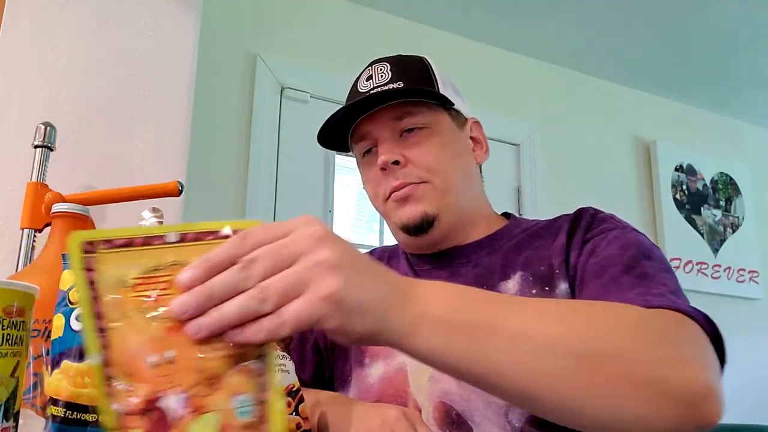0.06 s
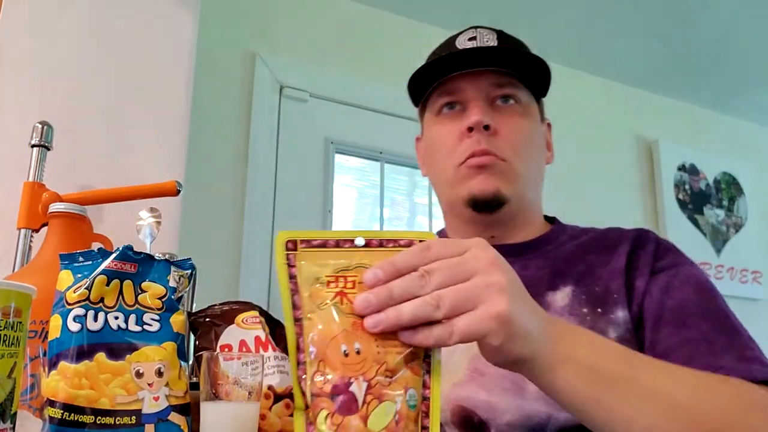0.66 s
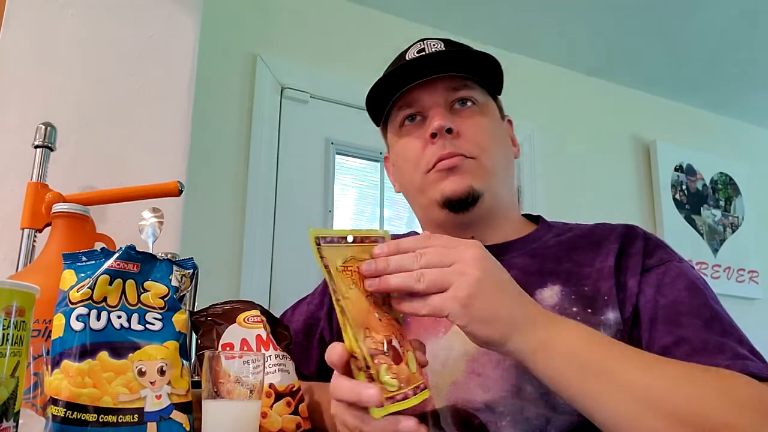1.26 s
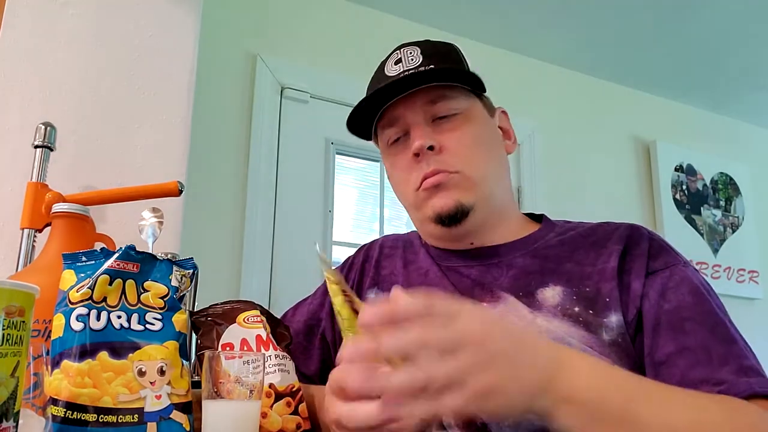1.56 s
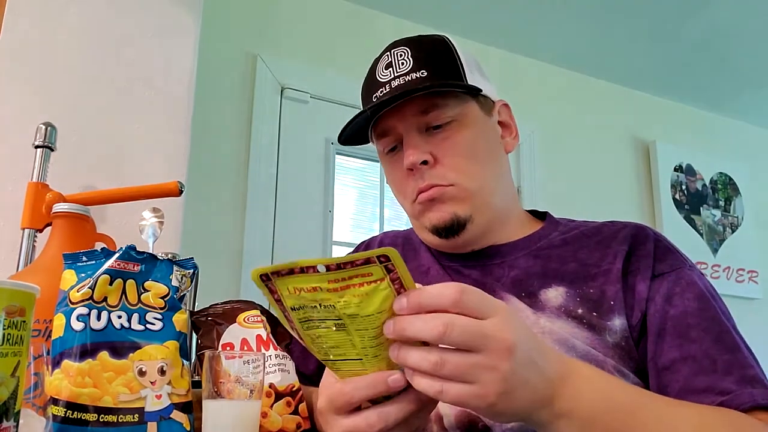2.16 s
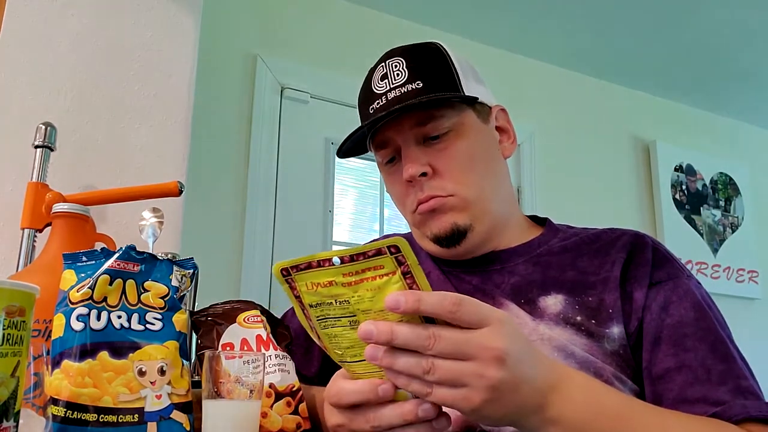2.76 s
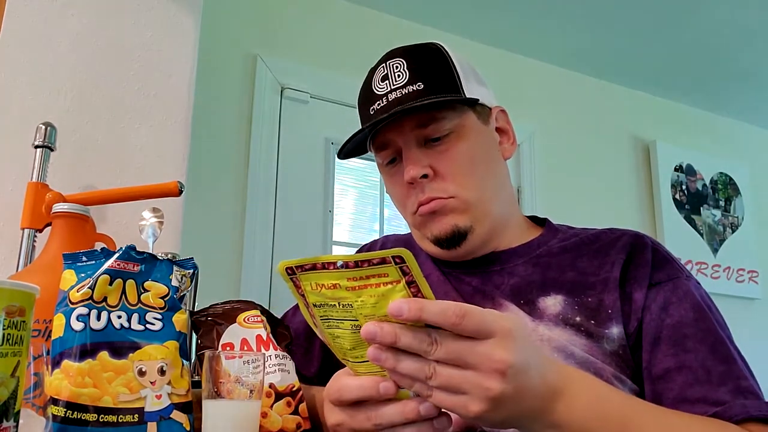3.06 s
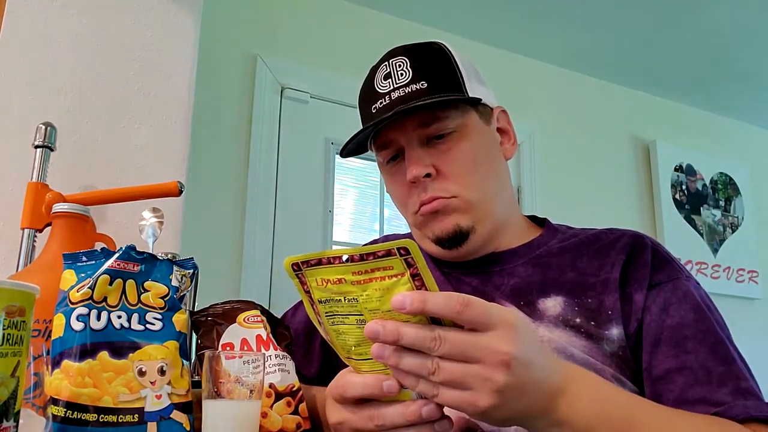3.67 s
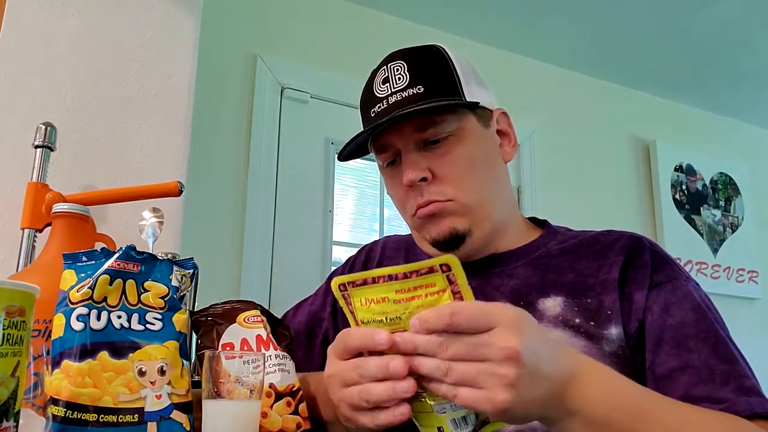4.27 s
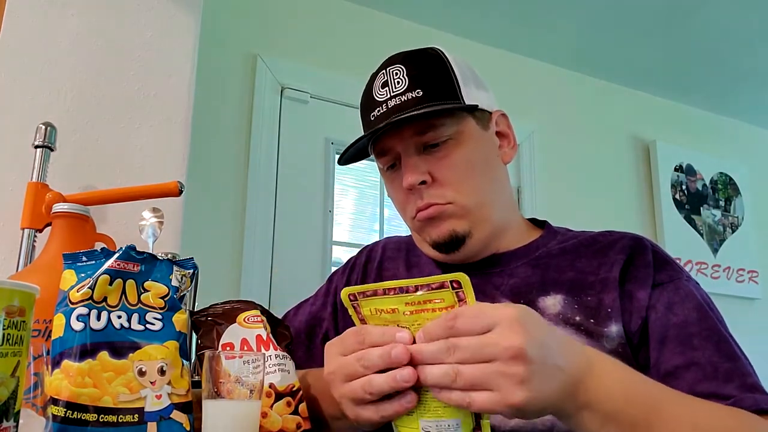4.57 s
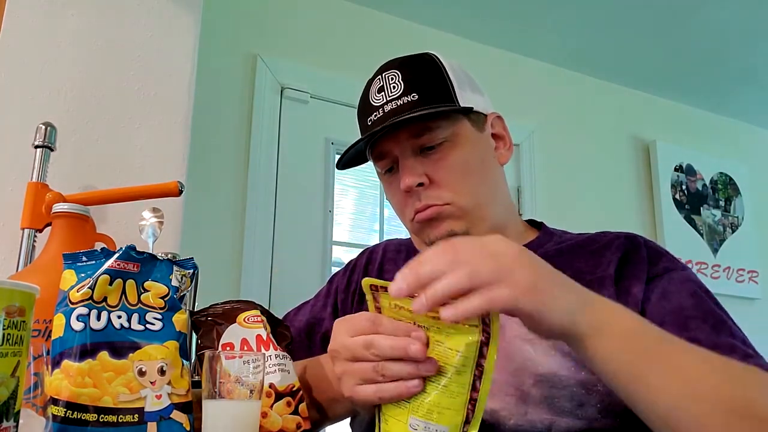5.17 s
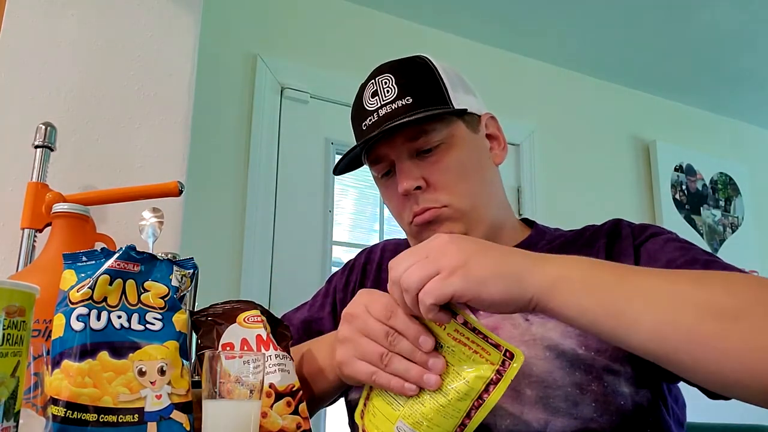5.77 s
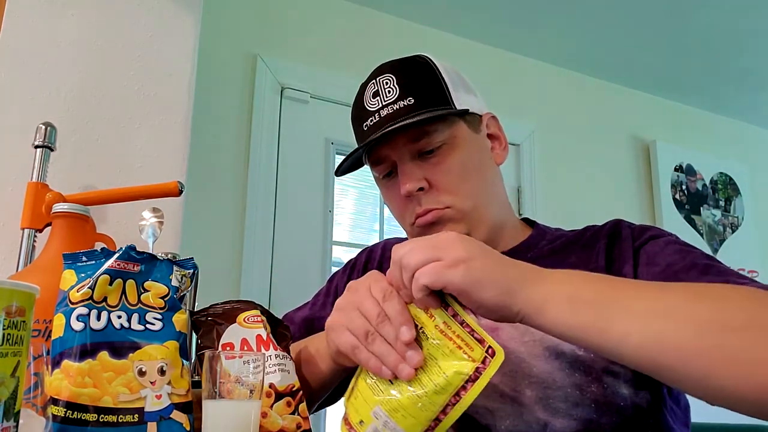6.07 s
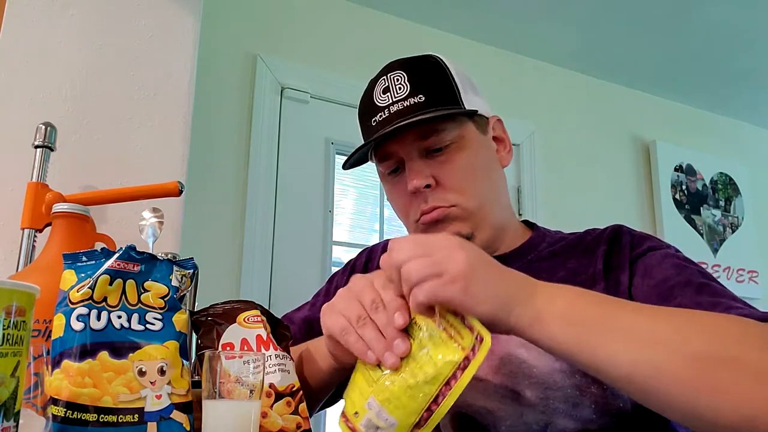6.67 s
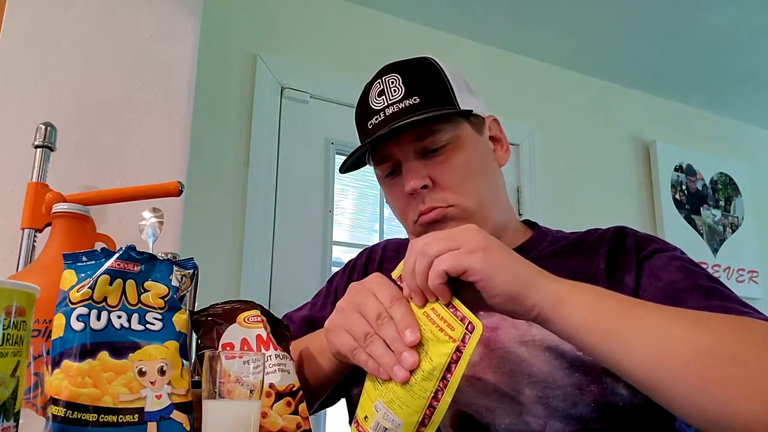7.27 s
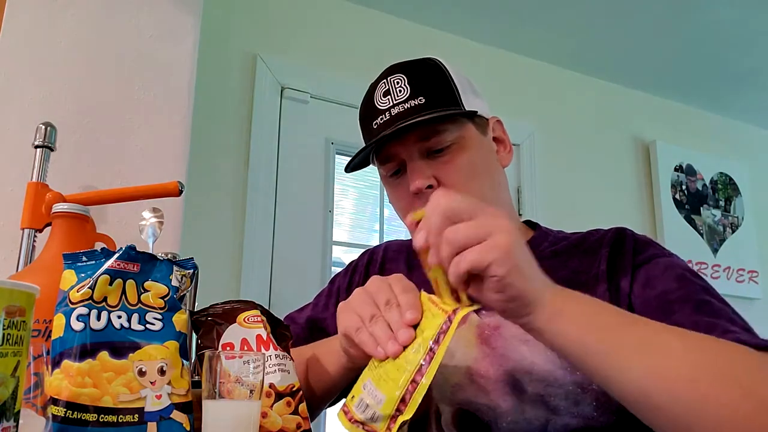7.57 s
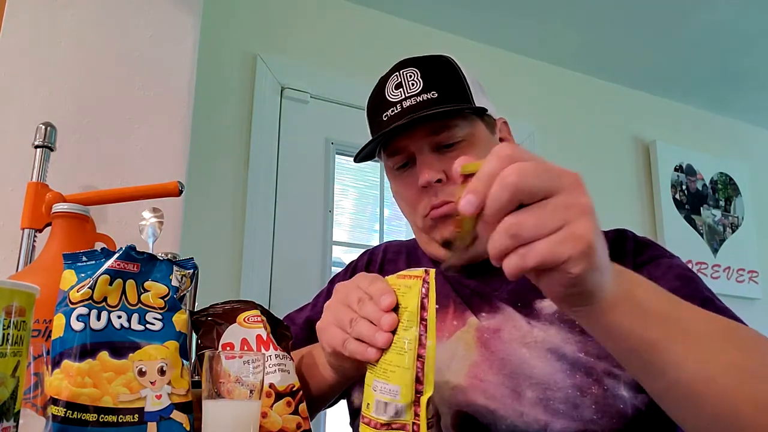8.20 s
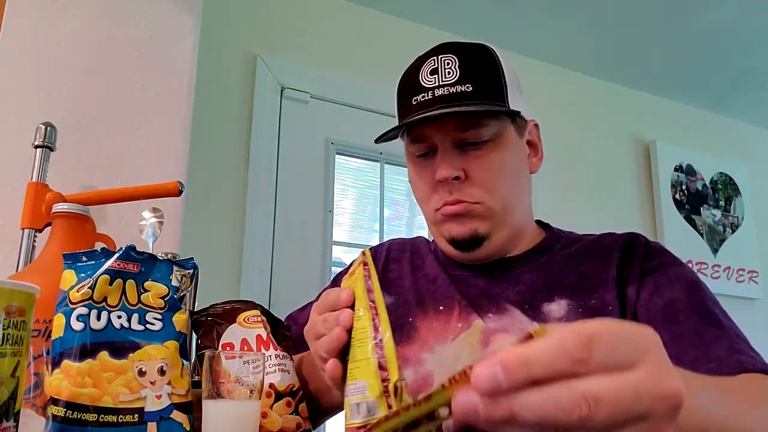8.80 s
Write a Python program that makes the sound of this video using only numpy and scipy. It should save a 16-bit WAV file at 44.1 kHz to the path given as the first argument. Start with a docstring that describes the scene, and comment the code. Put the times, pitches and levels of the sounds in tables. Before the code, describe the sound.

Close, irregular crinkles and sharp snaps of a plastic pouch being handled and torn open in a small room with a faint low rumble.

```python
"""A stiff plastic snack pouch crackles as hands turn it over and tear off its top strip, close by.
Each crease that buckles gives a short snap, a low pop of the pouch wall and a bright crack; small
neighbours follow, and tiny creases rustle under each stroke of the fingers. The pouch scuffs over
the table, and the small room answers with a short tail over a low ventilation rumble."""
import sys
import numpy as np
from scipy import signal
from scipy.fft import rfft, irfft
from scipy.io import wavfile

SR = 44100
rng = np.random.default_rng(int(sys.argv[2]) if len(sys.argv) > 2 else 0)


def file_out(sig):
    """Save sig as 16-bit WAV at sys.argv[1]."""
    # one column per channel
    cols = np.atleast_2d(sig).T
    # limit, then scale
    lim = np.clip(cols, -1, 1)
    pcm = np.round(lim * 32767).astype(np.int16)
    wavfile.write(sys.argv[1], SR, pcm)


N = 389844
TAPS = 2048
BINS = np.fft.rfftfreq(TAPS, 1 / SR)

# Loud buckling creases: (time [s], snap level [dB], wall pop over snap [dB], crack over snap [dB])
CREASES = [(0.0666, -41, 7.5, -25), (0.0886, -32, -7, -9), (0.0989, -27, -2, -10), (0.1112, -28, -18, -15),
           (0.1385, -31.5, -1, -28), (0.4504, -37.5, -12.5, -24), (0.7526, -29, 0, -30),
           (0.8034, -29, -5, -14), (0.817, -18, 0.5, -1), (0.829, -20, -2, -10), (0.8429, -20, -12, -7),
           (0.872, -30, -8, -22), (0.8828, -30, -4, -22), (0.928, -33, -32, -21), (0.9896, -39, -12, -34),
           (1.0389, -35.5, -3.5, -45), (1.084, -33.5, -5.5, -35), (1.1635, -24.5, -3.5, -10),
           (1.1711, -13.5, -9, -11), (1.2319, -27.5, -5, -15.5), (1.2373, -23, -3.5, -13.5),
           (1.2445, -19.5, -8.5, -15), (1.3011, -38, -9, -27), (1.3568, -21.5, -39, -7),
           (1.4807, -29.5, -6, -5), (1.5201, -30.5, -12, -20), (1.556, -26, -15.5, -21),
           (1.591, -28.5, 5, -17), (1.7195, -29.5, -4, -11), (1.9685, -51.5, -7, -25),
           (2.0677, -24, -16.5, -36), (2.11, -35.5, 2.5, -9.5), (2.1335, -36, -4, -33.5),
           (2.1716, -27.5, -19, -37), (2.1914, -22, -8, -17), (2.244, -25, -9, -18),
           (2.2655, -38, 5.5, -26), (2.3095, -40, 1.5, -47), (2.5256, -29.5, -3.5, -6),
           (2.6094, -19, -10, -16.5), (2.6209, -22.5, -23, -7), (2.7774, -26, -4.5, -17),
           (2.7854, -30, -2, -31), (2.826, -28, -9.5, -17.5), (2.9277, -29, -18, -1.5),
           (2.936, -28, -12, -18), (2.954, -31.5, -27, -4), (3.0089, -24.5, -12, -17.5),
           (3.035, -28, -19.5, -4), (3.6764, -30.5, -1, -11), (3.6992, -25.5, -11.5, -9),
           (3.7706, -25, -12.5, -20), (3.9126, -25, -6, -18), (3.9271, -23, -8.5, -21),
           (4.0243, -18, -3, -7.5), (4.0671, -23, 3, -12), (4.0822, -19.5, -10, -8.5),
           (4.1191, -16.5, -11.5, -5.5), (4.1728, -28.5, -33, -16), (4.2188, -26.5, -12, -13),
           (4.2411, -28, -7.5, -16), (4.348, -17.5, -6, -16), (4.3663, -22.5, -3.5, -11),
           (4.3749, -17.5, -10.5, -19), (4.3902, -23, -0.5, -9), (4.4184, -19, -24, -13),
           (4.4558, -42.5, 15, -11.5), (4.4719, -25.5, -6.5, -4.5), (4.5364, -34.5, -11, -31),
           (4.5643, -33, -4, -8), (4.6059, -24, -7.5, -23), (4.6339, -19, -9.5, -13.5),
           (4.7013, -23.5, 2, -12.5), (4.7427, -21, -7.5, -10.5), (4.7667, -22.5, -4.5, -10),
           (4.784, -19.5, -2, -12), (4.8051, -24.5, -5.5, -18), (4.8238, -26.5, -17, -20),
           (4.8499, -21, -10.5, -7), (4.921, -27, -1.5, -22), (5.0014, -30, -14, -22.5),
           (5.0223, -43, 9.5, -19), (5.2392, -50, 5.5, -31), (5.2816, -32, 1, -21.5),
           (5.3431, -28.5, -0.5, -20), (5.3644, -20, -22, -21), (5.4044, -34, -4.5, -14),
           (5.447, -34.5, -1.5, -26), (5.5886, -33, -22, -22), (5.6576, -37, 0, -16.5),
           (5.7713, -40, 6, -4), (5.8555, -26, -7, -21), (5.8718, -20.5, -2.5, -6.5),
           (5.9097, -20.5, -9.5, -8), (5.9257, -26, -16, -4.5), (5.954, -24.5, -7.5, -6),
           (6.0885, -34.5, 3, -26), (6.1314, -31.5, -2, -32), (6.1443, -29, -7, -1.5),
           (6.3811, -30.5, 4, -4), (6.3919, -31.5, 0, -21), (6.4387, -25, -6, -7),
           (6.5041, -22.5, -0.5, -5.5), (6.5158, -24, 1, -11), (6.531, -16, -5, -5),
           (6.5424, -18.5, -12, -17), (6.6486, -39, 2, -17), (6.7338, -22, -7.5, -14.5),
           (6.8407, -32.5, -0.5, -19), (6.863, -26.5, -5, -8.5), (6.898, -28, -2.5, -20),
           (6.9846, -31, -11, -11), (6.9955, -23.5, -13, 2), (7.0208, -19, 1.5, -8), (7.0688, -29, -3, -11),
           (7.148, -31, -11, -31.5), (7.1636, -25.5, -3, -2.5), (7.1918, -32, -7, 0.5),
           (7.2136, -20, -2, -7.5), (7.2513, -18.5, -7, -14.5), (7.3487, -22.5, -11, -6),
           (7.4513, -39.5, 9, -12), (7.5083, -21, -17, -12), (7.5193, -16.5, -10, -9),
           (7.5584, -22, -9.5, -18.5), (7.6101, -25, 0.5, -16), (7.6284, -30, -2, -26.5),
           (7.686, -23, -4, -1.5), (7.901, -34.5, -2.5, -7), (7.9966, -38, 2.5, -9.5),
           (8.0953, -34, -3.5, -18), (8.1184, -26, -18, -6.5), (8.1843, -29, -1, -14),
           (8.467, -43.5, 2.5, -25.5), (8.6588, -37.5, -9.5, -15.5), (8.685, -40.5, -2.5, -15)]
# Fingers sliding, crumpling or tearing: (start [s], end [s], level [dB], spectral tilt [dB/octave])
STROKES = [(0, 0.07, -53, -4.5), (0.058, 0.155, -42.5, -7), (0.169, 0.506, -62.5, -6),
           (0.763, 0.792, -47, -6), (0.807, 0.888, -33, -3.5), (0.968, 1.088, -56.5, -6.5),
           (1.095, 1.159, -44.5, -5), (1.153, 1.263, -44, -4.5), (1.778, 2.08, -64.5, -4.5),
           (2.068, 2.312, -64, 2), (2.361, 2.516, -66, -2), (2.545, 2.584, -54.5, -9),
           (3.933, 4.29, -48.5, -4), (4.326, 4.497, -45, -2.5), (4.606, 4.854, -55.5, 0),
           (5.071, 5.107, -53, 0), (5.721, 5.854, -49, -3.5), (6.229, 6.328, -57.5, -11.5),
           (6.359, 6.425, -44, -7), (6.503, 6.816, -47.5, -6), (7.462, 7.526, -39.5, -4),
           (7.531, 7.694, -44, -6.5), (7.829, 7.92, -51.5, -3), (7.96, 8.107, -52, -3.5),
           (8.394, 8.577, -60, -8.5), (8.616, 8.799, -62.5, -5.5)]
USUAL_DB, USUAL_POP_DB, USUAL_CRACK_DB = -24, -7.5, -14.5  # ordinary crease: snap; pop, crack over it


def amp(db):
    """Amplitude grows tenfold for every 20 dB."""
    return 10 ** (np.asarray(db) / 20)


def read(points, hz):
    """Interpolation of a table on a logarithmic frequency axis."""
    f, value = np.transpose(points)
    return np.interp(np.log(hz + 1), np.log(f + 1), value)


def unit(x):
    """Normalisation to energy 1."""
    return x / np.sqrt(np.sum(x ** 2) + 1e-20)


def add(mix, s, sound):
    """Superposition: a sound (channels x samples) joins the mix at time s."""
    part = mix[:, max(round(s * SR), 0):][:, :sound.shape[1]]
    part += sound[:, :part.shape[1]]


def causal(db):
    """Minimum phase: the spectrum of the most compact ring that has this colour."""
    log_gain = np.log(amp(np.maximum(db, -100)))
    return np.exp(signal.hilbert(np.r_[log_gain, log_gain[-2:0:-1]]).conj())[:len(db)]


def coloured(x, db):
    """Convolution with a causal filter given in dB on BINS."""
    return signal.oaconvolve(x, irfft(causal(db)))[:len(x)]


def resonance_db(hz, q):
    """Frequency response of a damped oscillator, 0 dB at its peak."""
    return -10 * np.log10(1 + (q * (BINS / hz - hz / (BINS + 1))) ** 2)


def ports(spectrum, lag_ms):
    """Unequal paths: the right microphone port hears the pouch lag_ms after the left."""
    delay = np.exp(-2j * np.pi * BINS * lag_ms / 1000)
    return np.array([irfft(spectrum), irfft(spectrum * delay)])


def ventilation(level_db=-54, side_db=-14, hiss_db=-88):
    """Stationary noise: a rumble, nearly coherent at both ports, under a trace of hiss."""
    # Ventilation spectrum: (frequency [Hz], level [dB])
    spectrum = [(15, -49.5), (38, -14), (53, 3), (68, -0.5), (82, -1), (110, -8.5), (210, -22), (268, -6.5),
                (320, -25), (400, -19), (700, -39), (2000, -47.5), (6000, -59), (16000, -57)]
    colour = read(spectrum, BINS)
    mid, side = (unit(coloured(noise, colour)) * np.sqrt(N) for noise in rng.standard_normal((2, N)))
    rumble = np.array([mid + amp(side_db) * side, mid - amp(side_db) * side])
    return amp(level_db) * rumble + amp(hiss_db) * rng.standard_normal((2, N))


def rustle(clicks_per_s=800, spread_db=2.0, rub_db=-6, edge_s=0.013, lag_ms=0.07, apart=0.78):
    """Shot noise: each stroke sets off tiny creases of many sizes over the friction of skin on film."""
    # Rustle spectrum before each stroke's tilt: (frequency [Hz], level [dB])
    spectrum = [(60, -25), (200, -18.5), (400, -2), (560, -18), (850, -5.5), (1700, -3.5), (3500, -4.5),
                (6000, -7.5), (10000, -8), (16000, -28.5)]
    out = np.zeros((2, N))
    t = np.arange(SR // 2) / SR
    shape = (3, len(t))  # heard at both ports, only left, only right
    for start, end, db, tilt in STROKES:
        swell = np.clip(np.minimum(t, end - start - t) / edge_s, 0, 1)
        sizes = amp(spread_db * np.minimum(rng.exponential(1, shape), 4)) * rng.choice([-1, 1], shape)
        clicks = sizes * (rng.random(shape) < clicks_per_s / SR)
        rub = amp(rub_db) * unit(rng.standard_normal(shape))
        force = unit(unit(clicks) + rub) * np.sqrt(clicks.size)
        force = swell * (force[0] + apart * force[1:]) / np.hypot(1, apart)
        colour = read(spectrum, BINS) + tilt * np.log2(np.clip(BINS, 100, 6000) / 1000)
        ring = np.sqrt(2) * unit(ports(causal(colour), lag_ms))
        add(out, start, amp(db) * signal.oaconvolve(force, ring, axes=1))
    return out


def drags(hz=235, q=2.0, edge_s=.02):
    """Sliding friction: the full pouch scuffs over the table with a low, hollow rub."""
    # Drags of the pouch's foot: (start [s], end [s], level [dB])
    scuffs = [(0, 0.16, -44), (0.785, .89, -44.5), (1.2, 1.28, -48.5)]
    out = np.zeros((1, N))
    t = np.arange(SR // 2) / SR
    for start, end, db in scuffs:
        rub = unit(coloured(rng.standard_normal(len(t)), 2 * resonance_db(hz, q))) * np.sqrt(len(t))
        swell = np.clip(np.minimum(t, end - start - t) / edge_s, 0, 1)
        add(out, start, amp(db) * swell * rub[None])
    return out


def voiced(s, snap, pop, crack, usual_hz=1870, octaves_per_db=0.03, spread_octaves=0.044):
    """A sharper fold resonates higher: rows of (time [s], snap [dB], pitch [Hz], pop [dB], crack [dB])."""
    octaves = octaves_per_db * (crack - USUAL_CRACK_DB) + spread_octaves * rng.standard_normal(len(s))
    return np.column_stack([s, snap, usual_hz * 2 ** octaves, snap + pop, snap + crack])


def small_creases(s, snap, pop_db_per_db=-0.12, crack_db_per_db=0.42):
    """Timbre scales with strength: a weaker crease has more pop and less crack for its size."""
    over = snap - USUAL_DB
    return voiced(s, snap, USUAL_POP_DB + pop_db_per_db * over, USUAL_CRACK_DB + crack_db_per_db * over)


def strays(snap_db=-34, firm_db=-45, db_per_db=1.0644, spread_db=7, count=3):
    """Buckling under a moving load: each stroke flips a few small creases, the firmer the louder."""
    start, end, db, _ = np.repeat(STROKES, count, axis=0).T
    when, weakness = rng.random((len(db), 2)).T
    snap = snap_db + db_per_db * (db - firm_db) - spread_db * weakness
    return small_creases(start + when * (end - start), snap)


def buckle(colour, lag_ms, chatter, chatter_ms, apart, build_ms=.9):
    """Snap-through: small slips build up to a sudden flip and die away, ringing the film."""
    ms = np.arange(TAPS) * 1000 / SR
    flip_ms = build_ms * rng.uniform(.5, 2.2)
    swell = np.minimum(ms / flip_ms, 1) ** 2 * np.exp(-ms / chatter_ms)
    slips = rng.standard_normal((3, TAPS)) * rng.exponential(1, (3, TAPS)) * swell
    force = chatter * unit(slips[0])
    force[np.searchsorted(ms, flip_ms)] += rng.choice([-1, 1])
    ring = causal(colour)
    sound = ports(rfft(force) * ring, lag_ms)
    sound += apart * np.array([irfft(rfft(unit(own)) * ring) for own in slips[1:]])  # each port's own
    return unit(sound) * np.sqrt(2 * .005 * SR)  # energy of rms 1 over 5 ms


def all_round(parts):
    """Incoherent summation: over all directions the ripples of slips average out and powers add."""
    power = sum((amp(level) * unit(amp(colour))) ** 2 for level, colour in parts)
    ring = irfft(causal(10 * np.log10(power / power.max())))
    return unit(ring)[None] * np.sqrt(power.sum() * .005 * SR)  # levels are rms over 5 ms


def creases(rows, snap_db=-1.22, pop_db=-0.84, crack_db=-0.74, q=1.15, lag_ms=0.072, lag_spread_ms=0.046):
    """Buckling excites damped resonances; gives the direct sound and the sound sent round the room."""
    # Snap spectrum of the film: (frequency [Hz], level [dB])
    film_spectrum = [(200, -28.5), (700, 0), (1000, -9.5), (1400, 0), (2400, 0), (3800, 1.5), (5000, -3.5),
                     (7500, -12.5), (16000, -38)]
    # Pop spectrum of the pouch wall: (frequency [Hz], level [dB])
    wall_spectrum = [(60, -25.5), (150, -12.5), (330, -4.5), (440, 0), (550, 4), (640, 1), (770, -8),
                     (1200, -2.5), (3000, -50.5)]
    # Spectrum of the bright crack: (frequency [Hz], level [dB])
    crack_spectrum = [(1000, -32), (3500, 4), (5200, 4.5), (7400, -2.5), (8400, 1), (11000, -2.5),
                      (15000, -10), (16500, -10)]
    direct, radiated = np.zeros((2, N)), np.zeros((1, N))
    sheet, bright = read(film_spectrum, BINS), read(crack_spectrum, BINS)
    for s, snap, hz, pop, crack in rows:
        place, size, damping, looseness = rng.standard_normal(4)
        lag = lag_ms + lag_spread_ms * place
        # a crease with little crack flips cleanly and rings longest; a bright one breaks into many slips
        ragged = np.exp(0.94 * looseness) * amp(0.42 * np.clip(crack - snap + 14, -16, 12))
        film = sheet + 2 * resonance_db(hz, q * np.exp(0.33 * damping) / np.sqrt(ragged))
        edge = bright + resonance_db(3.63 * hz, q=0.52)  # a stiffer fold cracks higher too
        wall = read(wall_spectrum, BINS) + resonance_db(520 * np.exp(0.28 * size), q=0.6)
        sound = amp(snap + snap_db) * buckle(film, lag, chatter=ragged, chatter_ms=2.7, apart=0.58)
        # the pop's long waves reach both ports nearly alike
        sound += amp(pop + pop_db) * buckle(wall, lag, chatter=0.87, chatter_ms=5.9, apart=0.3)
        sound += amp(crack + crack_db) * buckle(edge, lag, chatter=2 * ragged, chatter_ms=6.1, apart=0.87)
        add(direct, s, sound)
        broad_film = sheet + 2 * resonance_db(hz, q=0.84)
        add(radiated, s, all_round([(snap, broad_film), (pop, wall), (crack, edge)]))
    return direct, radiated


def knocks(rows, level_db=-29, hz=46, q=0.76):
    """Structure-borne sound: the hands pass a low thud of each pop on to the table and microphone."""
    blows = np.zeros(N)
    for s, _, _, pop, _ in rows:
        blows[round(s * SR)] += amp(pop + level_db) * rng.choice([-1, 1])
    thud = unit(irfft(causal(2 * resonance_db(hz, q)))) * np.sqrt(TAPS)
    return signal.oaconvolve(blows, thud)[:N]


def neighbours(soonest_s=.004, wait_s=.009, weaker_db=-15.0, spread_db=5, sharp_db_per_db=.4, count=2):
    """Elastic coupling: a crease takes small neighbours with it; sharp folds pass on the most."""
    s, snap, _, crack = np.repeat(CREASES, count, axis=0).T
    wait, weakness = rng.exponential(1, (len(s), 2)).T
    side = np.where(rng.random(len(s)) < .05, -1, 1)  # a few give way early
    passed_on = weaker_db + sharp_db_per_db * (crack - USUAL_CRACK_DB) - spread_db * weakness
    return small_creases(s + side * (soonest_s + wait_s * wait), snap + passed_on)


def room(direct, radiated, tail_db=-7.0, near_db=-7, near_s=0.011, onset_s=0.0032, alike_hz=1000):
    """Reverberation: direct sound, echoes, table scatter and a diffuse tail coherent in the bass."""
    # Reverberation time: (frequency [Hz], time to fall 60 dB [s])
    decay_times = [(150, 0.32), (500, 0.41), (1500, 0.4), (4000, 0.34), (9000, 0.37), (16000, 0.45)]
    # Spectrum of tail and scatter: (frequency [Hz], level [dB])
    spectrum = [(100, 8), (500, -2.5), (1000, 0), (1800, -8.5), (4000, -1.5), (9000, -2.5), (16000, -5.5)]
    # Reflections off the table and the body: (nominal delay [s], level [dB])
    echoes = [(.0026, -15.5), (.0043, -15.5), (.0098, -17.5), (0.018, -21)]
    hz, t, noise = signal.stft(rng.standard_normal((3, 26460)), SR, nperseg=256)  # 0.6 s
    alike = 1 / (1 + (hz[:, None] / alike_hz) ** 2)
    diffuse = np.sqrt(alike) * noise[2] + np.sqrt(1 - alike) * noise[:2]
    decay = amp(-60 * t / read(decay_times, hz)[:, None])
    tails = signal.istft(diffuse * decay, SR, nperseg=256)[1]
    scatters = signal.istft(diffuse[..., ::-1] * np.exp(-t / near_s), SR, nperseg=256)[1]
    rise = 1 - np.exp(-(np.arange(tails.shape[1]) / SR / onset_s) ** 2)
    colour = read(spectrum, BINS)
    response = [coloured(amp(tail_db) * unit(tail * rise) + amp(near_db) * unit(scatter * rise), colour)
                for tail, scatter in zip(tails, scatters)]
    out = direct + signal.oaconvolve(radiated, np.array(response), axes=1)[:, :N]
    for s, db in echoes:
        path = rng.uniform(.85, 2.2)  # each spot has its own path lengths
        add(out, s * path, amp(db) * direct)
    return out


def scene(spots=8):
    """Superposition of all sources; creases come from several spots, each with its own echoes."""
    # Balance between the ports: (frequency [Hz], left over right [dB])
    balance = [(80, -2.5), (380, 4), (700, 3), (1300, -3), (2400, 0.5), (4400, -2), (15000, 0)]
    loud = voiced(*np.transpose(CREASES))
    rows = np.vstack([loud, neighbours(), strays()])
    rubbing = rustle()
    heard = room(rubbing, rubbing[:1])
    heard += sum(room(*creases(rows[spot::spots])) for spot in range(spots))
    lean = read(balance, BINS) / 2
    pouch = np.array([coloured(heard[0], lean), coloured(heard[1], -lean)])
    return pouch + drags() + knocks(loud) + ventilation()


def record(dry, ceiling=.88, cutoff_hz=16100):
    """Soft saturation rounds off the highest peaks, then a low-pass filter limits the band."""
    rounded = dry / (1 + (dry / ceiling) ** 6) ** (1 / 6)
    low_pass = signal.firwin(255, cutoff_hz, window=("kaiser", 9), fs=SR)
    return signal.oaconvolve(rounded, low_pass[None], "same")


dry = scene()
out = record(dry)
file_out(out)
```